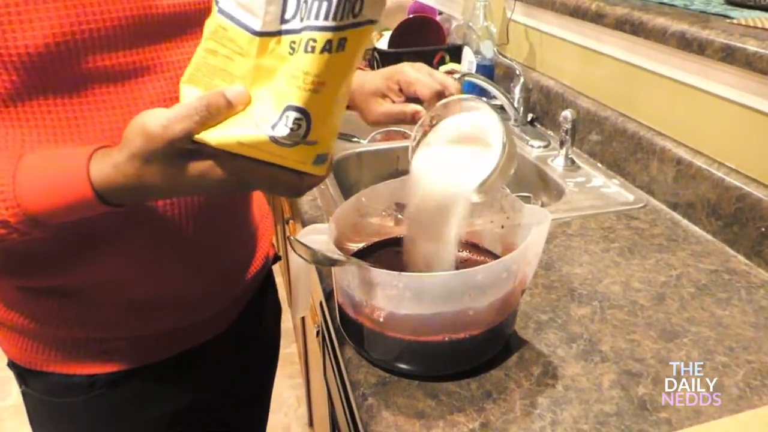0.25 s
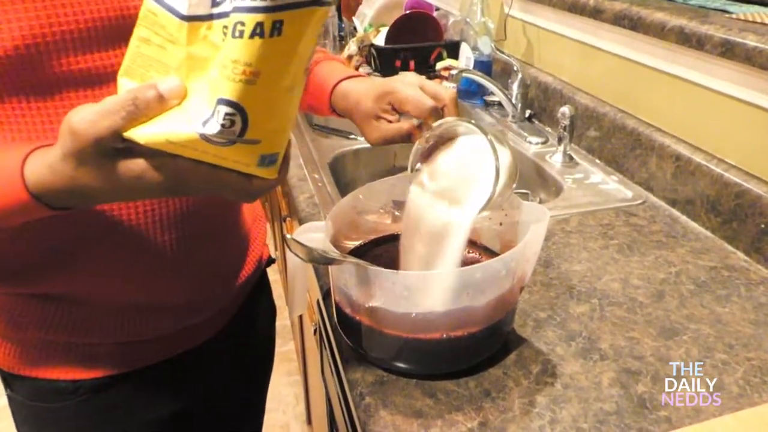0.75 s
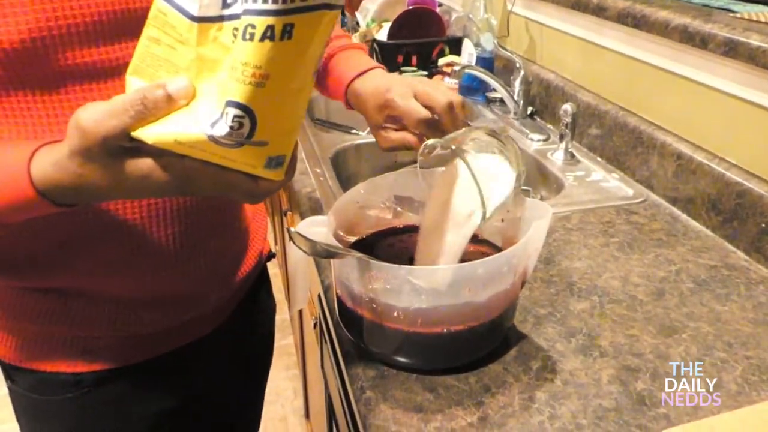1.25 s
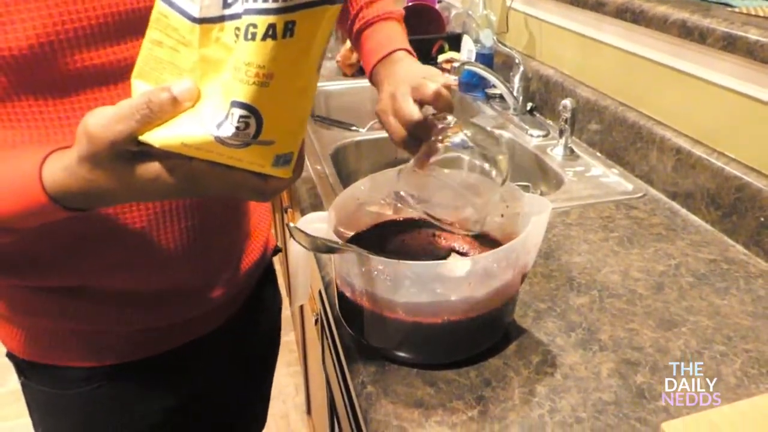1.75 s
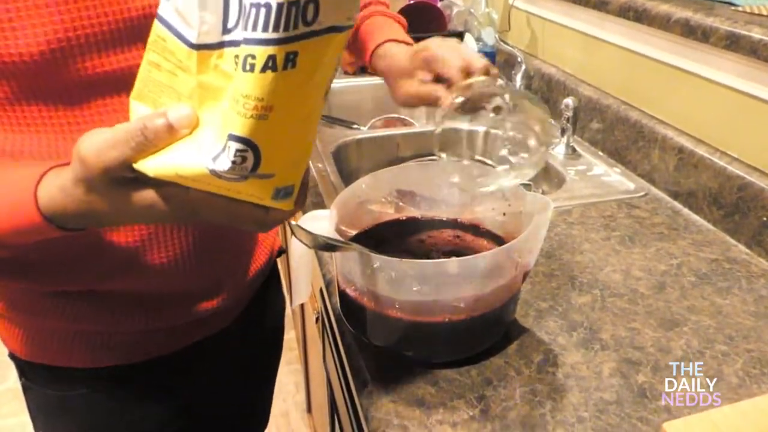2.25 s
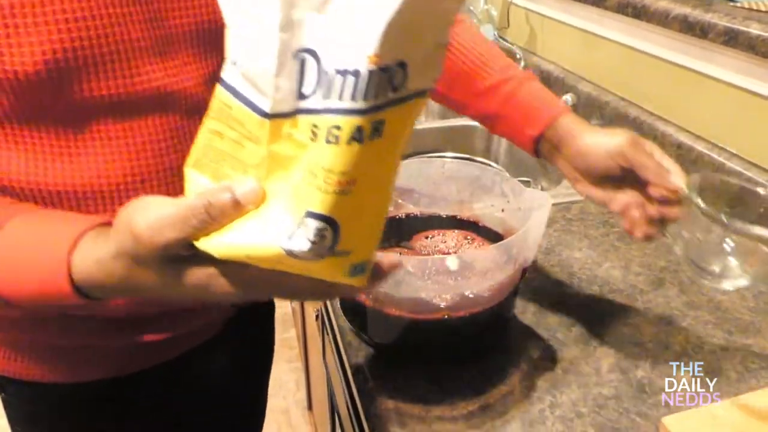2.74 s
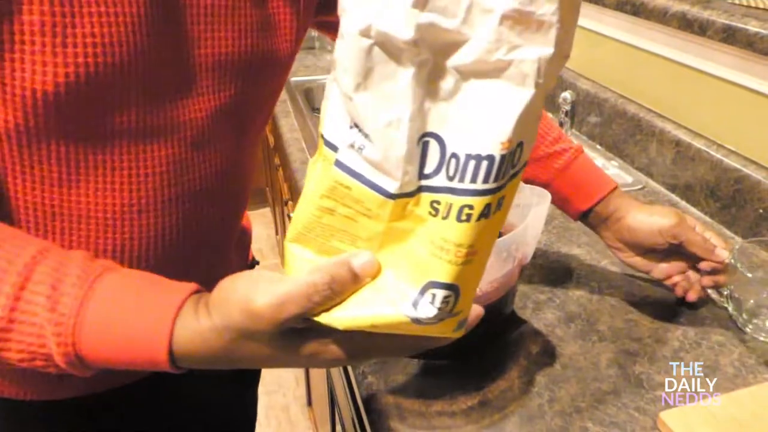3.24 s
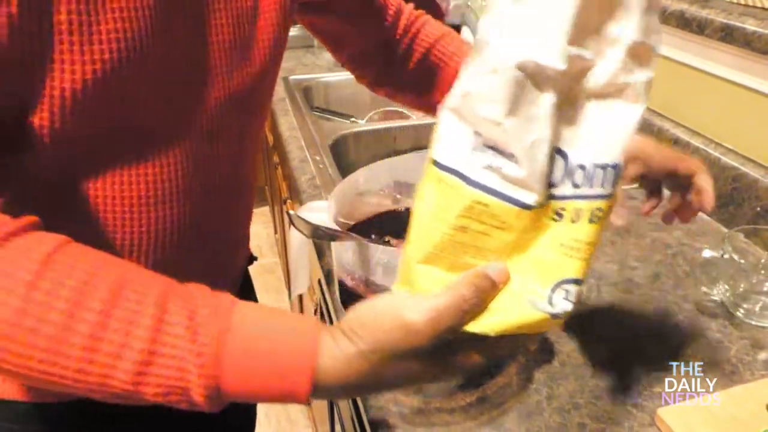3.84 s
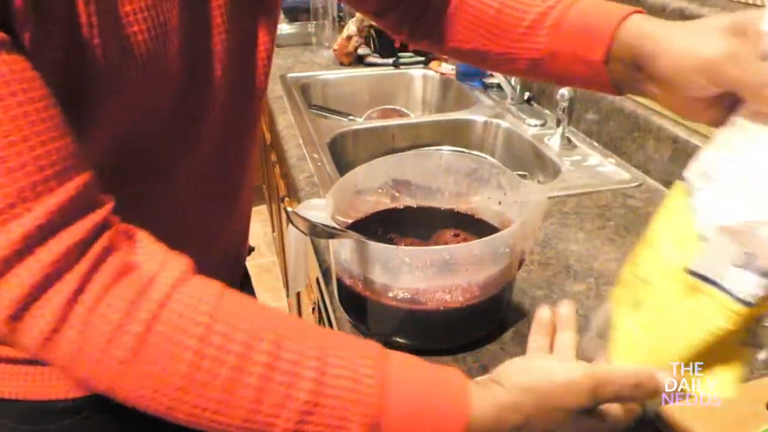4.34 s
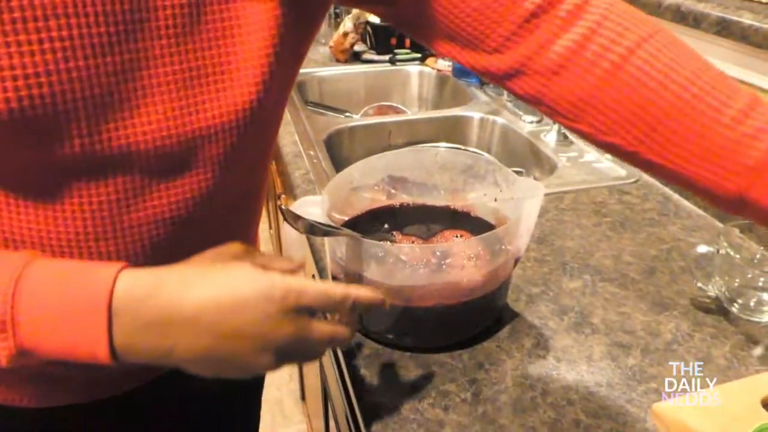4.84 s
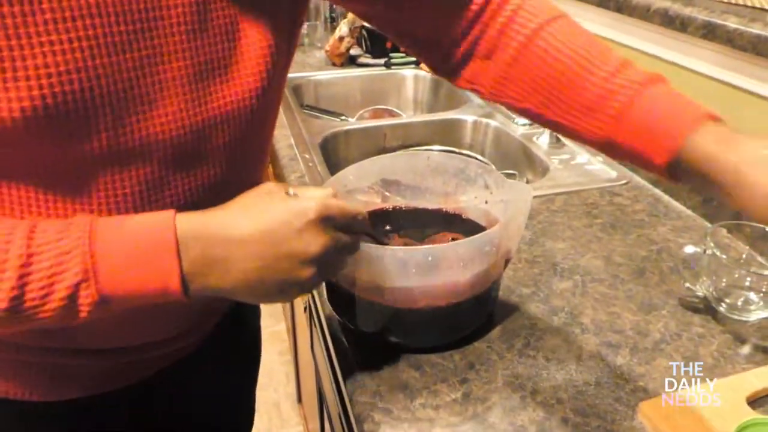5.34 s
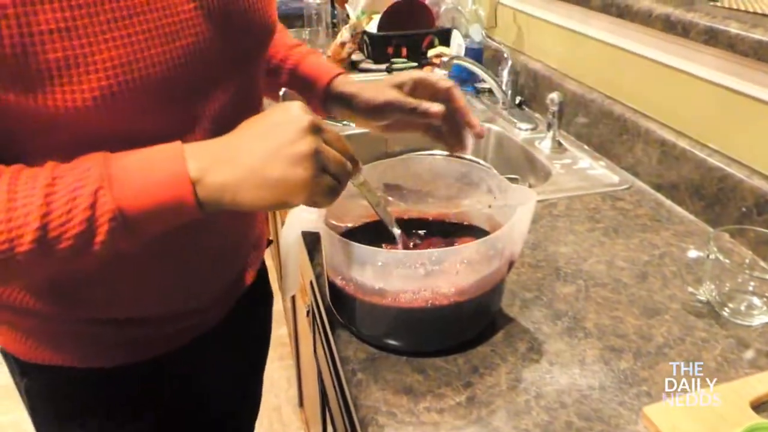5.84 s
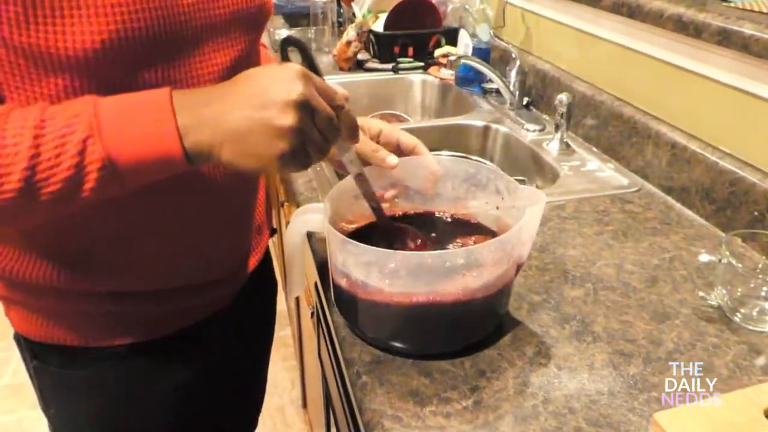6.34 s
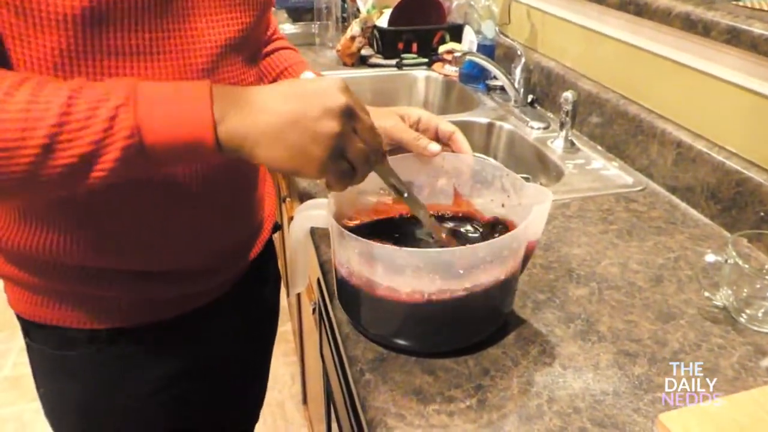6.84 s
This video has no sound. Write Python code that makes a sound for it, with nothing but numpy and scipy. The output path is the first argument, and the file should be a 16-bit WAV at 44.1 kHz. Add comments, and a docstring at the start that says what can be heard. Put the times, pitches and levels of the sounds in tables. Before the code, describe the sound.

Close in a small kitchen, a dry hiss of sugar fades into faint fizz in a pitcher of drink. Paper creaks lightly, then a thick glass cup thuds on the counter, drags and chatters to rest. A paper bag crackles sharply as it is put aside. Finally a spoon stirs with wet slaps, small ticks and rising plops.

```python
"""Sugar into a pitcher of drink, then a stir

Sugar slides from a glass cup into a plastic pitcher of drink: grains hiss, then fizz faintly with a few bubbles.
The cup is set on the counter, in thuds and cracks over ringing modes, and chatters to rest; the paper sugar bag
crackles in noise bursts as it is put aside. A spoon stirs the drink with noisy slaps, modal ticks and plops of
rising pitch. A small kitchen answers as decaying noise; the microphone is close and nearly mono."""
import sys
import numpy as np
from scipy import signal
from scipy.fft import rfft, irfft, next_fast_len
from scipy.io import wavfile
from scipy.ndimage import map_coordinates

SR = 44100
rng = np.random.default_rng(int(sys.argv[2]) if len(sys.argv) > 2 else 0)


def inscribe(sig):
    """Save sig as 16-bit PCM at rate SR to the path in sys.argv[1].

    A 1-D sig is mono; a 2-D sig holds one channel per row.
    Samples are clipped to [-1, 1] before scaling.
    """
    pcm = np.round(np.clip(np.atleast_2d(sig).T, -1, 1) * 32767)
    wavfile.write(sys.argv[1], SR, pcm.astype(np.int16))


N = 312669
TIME = np.arange(N) / SR  # the whole scene, in seconds
HIT = np.arange(SR // 2) / SR  # half a second for each single hit


def amp(db):
    """Decibels to gain."""
    return 10 ** (np.asarray(db) / 20)


def unit(x):
    """Scale to rms 1."""
    return x / np.sqrt(np.mean(x ** 2) + 1e-20)


def along(points, hz):
    """Read a curve of (Hz, value) points on a log frequency axis."""
    f, v = np.transpose(points)
    return np.interp(np.log(hz + 1), np.log(f + 1), v)


def level(rows):
    """Gain per sample from (s, dB) rows, practically silent outside them."""
    return amp(np.interp(TIME, *np.transpose(rows), left=-120, right=-120))


def wobble(rate):
    """A smooth random curve with rate knots a second."""
    knots = rng.standard_normal(int(N * rate / SR) + 4)
    return map_coordinates(knots, [TIME * rate])


def filtered(x, response):
    """Shape x by a response given as a function of frequency."""
    n = x.shape[-1]
    padded = next_fast_len(n + SR // 8)
    spectrum = rfft(x, padded) * response(np.fft.rfftfreq(padded, 1 / SR))
    return irfft(spectrum, padded)[..., :n]


def coloured(x, spectrum):
    """Shape x by a (Hz, dB) curve, at rms 1."""
    return unit(filtered(x, lambda hz: amp(along(spectrum, hz))))


def fade(t60, attack):
    """Envelope of a hit: a quick rise and an exponential decay, both in seconds."""
    return amp(-60 * HIT / t60) * (1 - np.exp(-HIT / attack))


def ring(modes, scatter_db, attack, diffuse=0):
    """Damped modes, struck at slightly new strengths; diffuse ones start at any phase."""
    out = np.zeros(len(HIT))
    for hz, db, t60 in modes:
        strength = amp(db + scatter_db * rng.normal())
        start_cycle = diffuse * rng.random()
        out += strength * fade(t60, attack) * np.sin(2 * np.pi * (hz * HIT + start_cycle))
    return out


def burst(spectrum, t60, attack, focus_hz=1000, focus_db=0):
    """A dying puff of noise, lifted around one pitch."""
    def shape(hz):
        octaves_off = np.log2((hz + 1) / focus_hz)
        return amp(along(spectrum, hz) + focus_db * np.exp(-(2 * octaves_off) ** 2))

    envelope = fade(t60, attack)
    puff = filtered(rng.standard_normal(len(HIT)), shape) * envelope
    return unit(puff) * np.sqrt(np.mean(envelope ** 2))


def grains(rate, spread_db):
    """Random tiny impacts of uneven size, rate of them a second on average, rms 1."""
    sizes = amp(spread_db * np.clip(rng.standard_normal(N), -2, 2)) * rng.choice([-1, 1], N)
    return unit(sizes * (rng.random(N) < rate / SR))


def add(track, s, sound):
    """Mix a sound into a track at time s."""
    part = track[max(round(s * SR), 0):][:len(sound)]
    part += sound[:len(part)]


def strokes(rows, attack, release, trend_db):
    """Gain of (start, length, dB) strokes that drift by trend_db, with edges of 20 dB per attack or release."""
    out = np.zeros(N)
    for start, length, db in rows:
        before = np.maximum(start - TIME, 0) / attack
        after = np.maximum(TIME - start - length, 0) / release
        drift = trend_db * np.clip((TIME - start) / length, 0, 1)
        out += amp(db + drift - 20 * np.minimum(before + after, 10))
    return out


def bubble(hz, t60, rise):
    """A pocket of air rings and climbs in pitch as it nears the surface."""
    pitch = hz * (1 + rise * np.minimum(HIT / t60, 1))
    return fade(t60, attack=0.000094) * np.sin(2 * np.pi * np.cumsum(pitch) / SR)


def froth(start, end, count, centre_hz, octaves, cycles):
    """A swarm of small bubbles, each dying within some cycles; rms 1 over the swarm's span."""
    out = np.zeros(N)
    for when, pitch, size in rng.random((count, 3)):
        hz = centre_hz * 2 ** (octaves * (2 * pitch - 1))
        add(out, start + when * (end - start), amp(-14 * size) * bubble(hz, cycles / hz, rise=0.22))
    return unit(out) * np.sqrt((end - start) * SR / N)


def plop(hz, t60, rise):
    """A bubble's tone swells as it pinches off, roughened by the film tearing around it."""
    pinch_cycles = 1.3  # time constant of the swell
    film = [(hz / 1.5, -35), (hz, 0), (1.25 * hz, -3), (2 * hz, -30)]
    swell = 1 - np.exp(-HIT * hz / pinch_cycles)
    return swell * bubble(hz, t60, rise) + .3 * burst(film, t60, attack=.001)


def room_tail():
    """A diffuse decay of energy 1: noise whose decay time depends on frequency."""
    # Reverberation of the kitchen. Each row: frequency in Hz, t60 in seconds.
    decay_times = [(150, 0.4), (400, 0.41), (1000, 0.38), (2800, 0.34), (7300, 0.32), (15000, 0.49)]
    hz, t, z = signal.stft(rng.standard_normal(len(HIT)), SR, nperseg=256)
    decay = amp(-60 * t / along(decay_times, hz)[:, None])
    tail = signal.istft(z * decay, SR)[1][:len(HIT)]
    tail = tail * (1 - np.exp(-HIT / 0.001))
    return tail / np.linalg.norm(tail)


def kitchen(x, wet_db):
    """The direct sound and the room's answer."""
    return x + amp(wet_db) * signal.fftconvolve(x, room_tail())[:len(x)]


def sugar():
    """Crystals hiss over the glass; as the flow dulls, their fizz in the drink remains."""
    # Flow of the sugar. Each row: time in seconds, relative level in dB.
    pour = [(0.0, -33.5), (0.284, -37), (0.554, -44), (0.608, -50), (0.772, -54), (1.18, -58), (1.682, -58),
            (1.79, -81)]
    # Colour of the dry hiss. Each row: frequency in Hz, density in dB per Hz.
    dry_sugar = [(180, -33), (300, -13), (470, -14), (519, -8), (761, -9.5), (1060, -3), (1840, -7.5),
                 (2030, -4.5), (2980, -6.5), (4980, -3.5), (7930, -7.5), (14000, -15), (16000, -31.5)]
    # Colour of sugar entering the drink. Each row: frequency in Hz, density in dB per Hz.
    sinking = [(470, -41), (800, -30), (935, -12), (1040, -9), (1890, -15.5), (4940, -10), (5980, -11.5),
               (14000, -30.5)]
    sliding = np.interp(TIME, [.52, .66], [1, 0])  # crossfade from hiss to fizz
    hiss = coloured(grains(rate=9000, spread_db=1), dry_sugar)
    fizz = amp(-2) * coloured(grains(rate=1200, spread_db=4), sinking)
    fizz += amp(-6) * froth(.6, 1.7, count=170, centre_hz=3900, octaves=.7, cycles=90)
    blend = sliding * hiss + (1 - sliding) * fizz
    return kitchen(amp(0.5) * level(pour) * blend, wet_db=-6.0)


def room_tone():
    """Steady air noise with a swelling low rumble and a wavering appliance hum."""
    # Colour of the air noise. Each row: frequency in Hz, density in dB per Hz.
    air_colour = [(30, -11), (60, -13.5), (160, -12.5), (210, -11.5), (250, -4.5), (340, -9.5),
                  (480, -10.5), (700, -14), (1400, -20.5), (3200, -28.5), (8000, -31), (16000, -31)]
    # Tones of an appliance. Each row: frequency in Hz, mean rms level in dB.
    hum_tones = [(247.6, -60), (349.9, -62.5)]
    rumble_colour = [(12, -21), (26, 4), (38, -27), (70, -16.5), (130, -51.0), (400, -80)]  # Hz, dB per Hz
    air = amp(-52.5) * coloured(rng.standard_normal(N), air_colour)
    swells = amp(-53.5 + 2 * wobble(5.5))
    rumble = swells * coloured(rng.standard_normal(N), rumble_colour)
    hum = np.zeros(N)
    for hz, db in hum_tones:
        strength = amp(db + 0.8 * wobble(4.8)) * np.sqrt(2)
        hum += strength * np.sin(2 * np.pi * hz * TIME + 0.28 * wobble(3.0))
    return air + rumble + hum


def drink():
    """Stirring sloshes and froths; slaps thump the plastic wall and trapped air plops."""
    # Sugar and spoon strike the drink and the pitcher wall.
    # Each row: time in seconds, level in dB, pitch in Hz, t60 in seconds.
    slaps = [(1.439, -28, 1380, 0.019), (5.532, -44.5, 704, 0.027), (5.868, -26.5, 1060, 0.055),
             (5.931, -28.5, 1410, 0.059), (6.035, -16.5, 3320, 0.018), (6.1797, -11.5, 2500, 0.037),
             (6.599, -23.5, 3000, 0.04), (6.643, -27, 3000, 0.013), (6.661, -23.5, 6070, 0.011),
             (6.711, -16.5, 1120, 0.048), (6.733, -25, 1270, 0.079), (6.855, -15.5, 2180, 0.042),
             (6.898, -28, 1100, 0.074), (7.068, -28.5, 1150, 0.16)]
    # Colour of a splash. Each row: frequency in Hz, density in dB per Hz.
    splash = [(71, -59), (120, -14), (217, -22), (492, -3.5), (697, -11.5), (1140, 1), (1340, -7),
              (2480, -11.5), (3040, -18.5), (4130, -16), (6620, -20.5), (16000, -53.5)]
    # Modes of the pitcher wall. Each row: frequency in Hz, level in dB, t60 in seconds.
    pitcher = [(124, -11.5, 0.08), (209, -6, 0.059), (352.4, 1, 0.065), (499, 3, 0.035), (663, 0.5, 0.011)]
    # The spoon sweeps through the drink. Each row: start in seconds, length in seconds, level at the start in dB.
    stir = [(5.73, 0.071, -42.5), (5.85, 0.037, -39.5), (5.94, 0.069, -45.5), (6.08, 0.052, -43),
            (6.20, 0.017, -37), (6.425, 0.049, -44), (6.72, 0.082, -42.5), (6.865, 0.044, -29),
            (6.95, 0.07, -45.5), (7.07, 0.03, -43)]
    # Single bubbles. Each row: time in seconds, level in dB, pitch in Hz, share the pitch climbs a second.
    bubbles = [(0.792, -40, 1970, 25), (0.802, -37, 2850, 15), (1.256, -36.5, 830, 8.2),
               (1.286, -33, 1070, 20), (6.183, -21, 1150, 2.2), (6.185, -30, 201, 1.2),
               (6.43, -35, 1175, 2), (6.454, -26.5, 1110, 2), (6.607, -19.5, 1052, 3.2),
               (6.6425, -18.5, 2166, 7.4), (6.725, -27, 1450, 7), (6.734, -19, 1127, 5),
               (6.764, -28, 2280, 5), (6.808, -31, 2030, 5.3), (6.831, -24, 1074, 3.4),
               (6.856, -21, 2060, 9), (6.868, -26, 855, 6), (6.899, -20.5, 1070, 3.7),
               (6.915, -25.5, 2230, 3.6), (6.996, -16, 1827, 11), (7.046, -23, 1970, 7.1)]
    wall_db, wall_db_per_octave = -3.5, -11  # thump under a 1 kHz slap; small, high slaps hardly move it
    bubble_t60_s, shortening = 0.051, 0.56  # ring time at 1 kHz; exponent of its fall with pitch

    spray = grains(rate=1100, spread_db=4) * amp(2.5 * wobble(50))
    slosh = amp(-0.5) * coloured(spray, splash)
    slosh += amp(-6) * froth(5.7, 7.09, count=220, centre_hz=1700, octaves=1.3, cycles=30)
    out = kitchen(strokes(stir, attack=0.049, release=0.043, trend_db=-2.5) * slosh, wet_db=-5)
    for s, db, hz, t60 in slaps:
        slap = burst(splash, t60, attack=.0005, focus_hz=hz, focus_db=9)
        thump_db = wall_db + wall_db_per_octave * np.log2(hz / 1000)
        wall = amp(thump_db) * ring(pitcher, scatter_db=4.5, attack=0.0013)
        add(out, s, amp(db) * kitchen(slap + wall, wet_db=-4.5))
    for s, db, hz, climb in bubbles:
        t60 = bubble_t60_s * (1000 / hz) ** shortening
        add(out, s, amp(db) * kitchen(plop(hz, t60, climb * t60), wet_db=-8.5))
    return out


def bag():
    """Creases snap and drum the hollow bag, over the rub of paper and hand."""
    # The bag buckles. Each row: time in seconds, level in dB, pitch of the crease in Hz,
    # relative level of the hollow body in dB.
    snaps = [(2.521, -47, 2200, 5), (2.651, -25, 3400, -13), (2.767, -29, 2430, -2.5),
             (2.777, -16, 5800, 0.5), (4.146, -36.5, 2040, 14), (4.202, -30.5, 3800, 1),
             (4.270, -20.5, 3530, 3), (4.287, -17, 3970, -2), (4.304, -6.5, 4700, -2.5),
             (4.336, -7, 5200, -10), (4.462, -42.5, 2000, 9.5), (4.639, -36.5, 2480, 0.5),
             (4.817, -30.5, 2000, 4.5), (4.839, -19, 2600, 1.5), (4.843, -13.5, 3200, -2),
             (5.021, -13.5, 3000, -35), (5.025, -11.5, 3280, -30), (5.052, -18.5, 5000, -9),
             (5.074, -31.5, 1500, -1), (5.250, -36, 6100, -21)]
    # Colour of crisp paper. Each row: frequency in Hz, density in dB per Hz.
    paper = [(80, -45), (250, -5.5), (800, -8.5), (2000, 0.5), (3000, -0.5), (5500, -1), (8000, -7.5),
             (12000, -22.5), (16000, -42)]
    # Colour of the hollow bag. Each row: frequency in Hz, density in dB per Hz.
    bag_body = [(60, -45), (150, -56), (330, 1), (520, 0.5), (850, 8.5), (1300, -1.5), (2500, -9.5),
                (6000, -45)]
    # Fingers squeeze and shift the bag. Each row: start in seconds, length in seconds, relative level in dB.
    rustle = [(2.19, 0.02, -54), (2.37, 0.03, -56.5), (2.52, 0.03, -51.5), (2.69, 0.093, -59),
              (4.10, 0.19, -37.5), (4.38, 0.09, -49.5), (4.55, 0.055, -44), (4.825, 0.043, -34),
              (5.01, 0.063, -38), (5.13, 0.033, -52)]
    # Colour of the rubbing. Each row: frequency in Hz, density in dB per Hz.
    rubbing = [(88, -40), (150, -8), (280, 2.5), (439, -7.5), (649, 1), (744, -12), (1020, -0.5),
               (2010, -7.5), (5240, -10.5), (12900, -25.5), (16000, -50)]
    # A hand speeds up along the paper and lifts off.
    # Each row: start in seconds, length in seconds, relative level at the start in dB.
    swishes = [(4.69, 0.12, -52.5), (4.99, 0.025, -50.5), (5.15, 0.023, -59.5)]
    # Colour of the hand on smooth paper. Each row: frequency in Hz, density in dB per Hz.
    smooth_paper = [(500, -8), (2000, -4.5), (4000, -6.5), (6800, -2.5), (10000, -13), (15000, -20)]
    crease_cycles = 70  # a crease dies within this many cycles: small, high ones are the shortest

    clumps = amp(2.2 * wobble(70))
    crumple = coloured(grains(rate=2600, spread_db=4) * clumps, rubbing)
    crumple += amp(-6) * coloured(grains(rate=70, spread_db=4), paper)
    rub = strokes(rustle, attack=0.028, release=0.11, trend_db=-4.0) * crumple
    smooth = coloured(rng.standard_normal(N), smooth_paper)
    swish = strokes(swishes, attack=0.072, release=0.047, trend_db=10.5) * smooth
    out = kitchen(amp(2) * (rub + swish), wet_db=-10.0)
    for s, db, hz, body_db in snaps:
        t60 = crease_cycles / hz
        crease = burst(paper, t60, attack=.00015, focus_hz=hz, focus_db=6)
        body = amp(body_db + 1.5) * burst(bag_body, 1.81 * t60, attack=0.0011)
        add(out, s, amp(db) * kitchen(crease + body, wet_db=-8.5))
    return out


def cup():
    """The thick glass thuds on the counter, drags, rocks, and rings as it chatters to rest."""
    # The cup meets the counter; its hard rim cracks and clatters more than its flat foot.
    # Each row: time in seconds, level of the knock in dB, relative level of the crack in dB.
    knocks = [(3.144, 4, -8), (3.36, -17, -38.5), (3.377, -5, -17), (3.675, -4.5, -20.5),
              (3.756, -11, -23.5), (3.806, -12, -32), (3.852, -3, -6.5)]
    # The counter gives under the cup. Each row: frequency in Hz, level in dB, t60 in seconds.
    thud_modes = [(382, 4.5, 0.014), (281, -5, 0.0086), (603, 0, 0.0037), (137, -30, 0.17)]
    # Lasting ring of the counter top. Each row: frequency in Hz, level in dB, t60 in seconds.
    counter = [(250.4, 2, 0.35), (333.4, 1.5, 0.23), (414.6, -1, 0.21), (455, -0.5, 0.15),
               (535.6, -2, 0.27), (794, -1.5, 0.077)]
    # Modes of the cup. Each row: frequency in Hz, level in dB, t60 in seconds.
    glass = [(1018, 6.5, 0.066), (1564, 16.5, 0.03), (1640, -9.5, 0.48), (1700, -15, 0.36)]
    # Colour of the crack. Each row: frequency in Hz, density in dB per Hz.
    crack_colour = [(300, -13), (800, 23), (1400, 9.5), (3000, 8.5), (5500, -4), (7500, -25),
                    (15000, -64.5)]
    # Colour of loose things shaken on the counter. Each row: frequency in Hz, density in dB per Hz.
    clatter_colour = [(120, -25), (250, -20), (450, 7.5), (800, 5.5), (1300, -5), (2000, -15.5),
                      (4000, -33), (7000, -36.5), (12000, -89)]
    # The cup drags between knocks. Each row: start in seconds, length in seconds, level at the start in dB.
    slides = [(3.24, 0.17, -36), (3.545, 0.066, -35), (3.70, 0.15, -43.5)]
    # Colour of the drag. Each row: frequency in Hz, density in dB per Hz.
    scrape = [(88, -59), (150, -34.5), (229, -12), (408, -4), (680, -21.5), (885, -17), (1330, -29.5),
              (1760, -25.5), (2680, -35.5), (2920, -30), (10000, -50.5), (13000, -73), (22000, -120)]
    flight_s, shrink = 0.022, 0.94  # first flight of the chatter; each flight over the one before
    chatter_db, chatter_crack_db = -9.5, -17.5  # equal bounces after the last knock
    clatter_db, clatter_per_crack = -12.5, 0.8  # clatter at a 0 dB crack; dB gained per dB of crack

    drag = coloured(grains(rate=2500, spread_db=4), scrape)
    out = strokes(slides, attack=0.088, release=0.2, trend_db=-3.5) * drag
    radiation = lambda hz: (1j * hz / (1j * hz + 110)) ** 2  # a board hardly radiates deep bass
    let_go = knocks[-1][0]
    landings = let_go + np.cumsum(flight_s * shrink ** np.arange(3))
    chatter = [(s, chatter_db, chatter_crack_db) for s in landings]
    for s, db, crack_db in knocks + chatter:
        thud = amp(3.0) * filtered(ring(thud_modes, scatter_db=2.5, attack=0.0016), radiation)
        board = amp(-23.0) * ring(counter, scatter_db=3, attack=0.0052, diffuse=True)
        crack = amp(crack_db) * burst(crack_colour, t60=0.013, attack=.0001)
        shaken = amp(clatter_db + clatter_per_crack * crack_db)
        clatter = shaken * burst(clatter_colour, t60=0.43, attack=0.00067)
        knock = kitchen(thud, wet_db=-9.5) + kitchen(crack, wet_db=-11.0) + board + clatter
        add(out, s, amp(db) * knock)
    # the freed cup rings at its last knock
    freed = ring(glass, scatter_db=3.0, attack=0.00064, diffuse=True)
    add(out, let_go, amp(-20) * kitchen(freed, wet_db=-8))
    return out


def spoon():
    """The steel bowl of the spoon rings briefly at each touch."""
    # Ticks under the surface; the deeper the spoon, the lower it rings.
    # Each row: time in seconds, level in dB, pitch as a multiple of the modes.
    ticks = [(6.507, -21.5, 1.02), (6.572, -36, 0.95), (6.6034, -11, 1.0), (6.754, -20.5, 1.15),
             (6.775, -26, 1.1), (6.781, -25.5, 0.96), (6.806, -26, 1.04)]
    # The spoon, damped by the drink. Each row: frequency in Hz, level in dB, t60 in seconds.
    spoon_modes = [(3820, -1, 0.012), (4230, -3.5, 0.016), (4700, -6, 0.012), (5300, -11, 0.011),
                   (6460, -13, 0.0073)]
    out = np.zeros(N)
    for s, db, pitch in ticks:
        modes = [(pitch * hz, mode_db, t60) for hz, mode_db, t60 in spoon_modes]
        tick = ring(modes, scatter_db=3.0, attack=0.00025, diffuse=True)
        add(out, s, amp(db) * kitchen(tick, wet_db=-9.5))
    return out


def scene():
    """The two channels are almost the same; only a faint extra room decay and a faint hiss differ."""
    mid = sugar() + room_tone() + drink() + bag() + cup() + spoon()
    side = amp(-38) * signal.fftconvolve(mid, room_tail())[:N]
    hiss = amp(-63.5) * rng.standard_normal((2, N))
    return np.array([mid + side, mid - side]) + hiss


def gain_control(x, limit_db, recovery):
    """Loud peaks duck the gain within milliseconds; it climbs back at recovery dB a second."""
    excess = np.maximum(20 * np.log10(np.abs(x).max(axis=0) + 1e-9) - limit_db, 0)
    held = np.maximum.accumulate(excess + recovery * TIME) - recovery * TIME
    lag = np.exp(-1 / (0.0054 * SR))  # 5.4 ms smoothing
    return x * amp(-signal.lfilter([1 - lag], [1, -lag], held))


def record(dry):
    """A narrow microphone notch, gain control, clipping at full scale and a band limit."""
    top_hz = 15950
    notch = lambda hz: 1 - .8 / (1 + ((hz - 5915) / 50) ** 2)
    controlled = gain_control(filtered(dry, notch), limit_db=-3.5, recovery=45)
    clipped = np.clip(controlled, -1, 1)
    return filtered(clipped, lambda hz: hz < top_hz)


dry = scene()
out = record(dry)
inscribe(out)
```